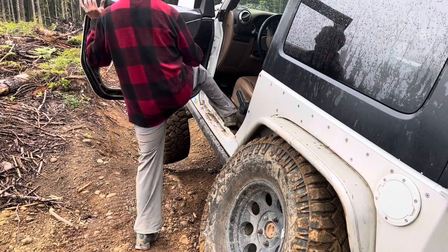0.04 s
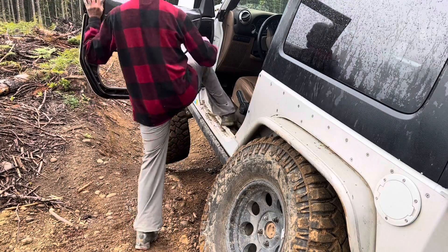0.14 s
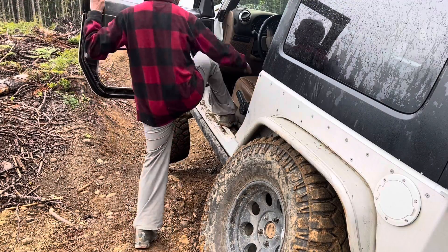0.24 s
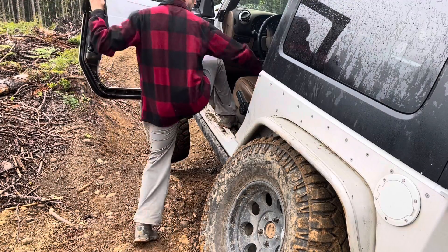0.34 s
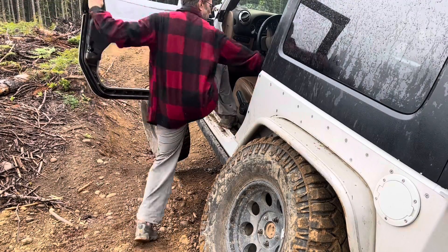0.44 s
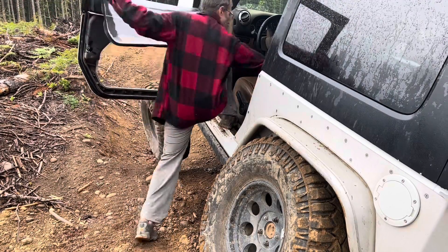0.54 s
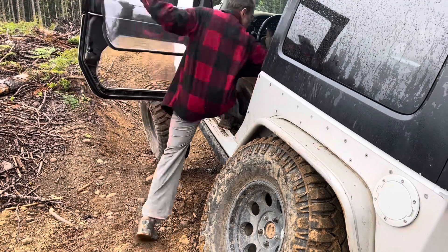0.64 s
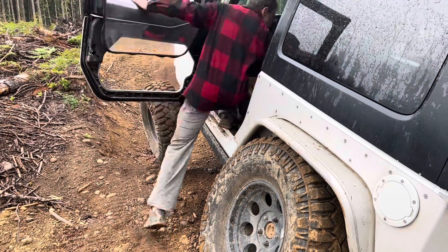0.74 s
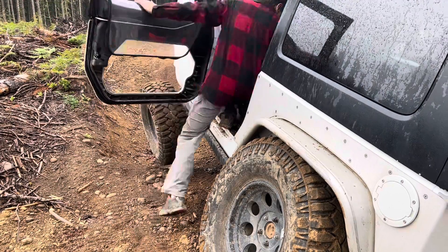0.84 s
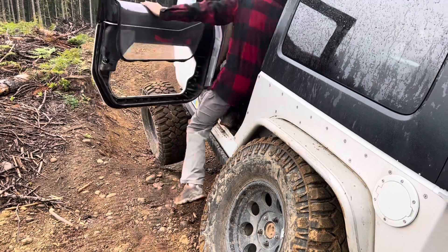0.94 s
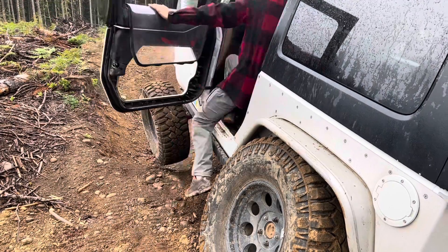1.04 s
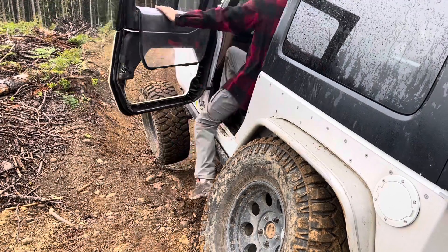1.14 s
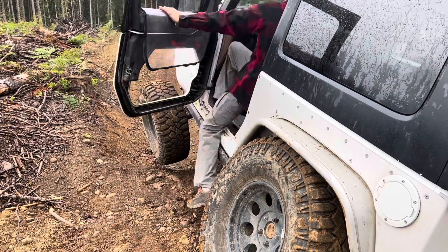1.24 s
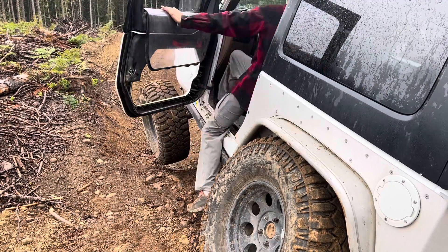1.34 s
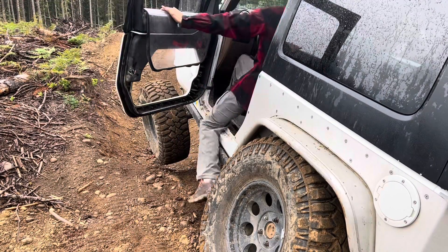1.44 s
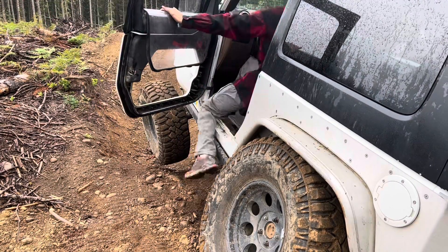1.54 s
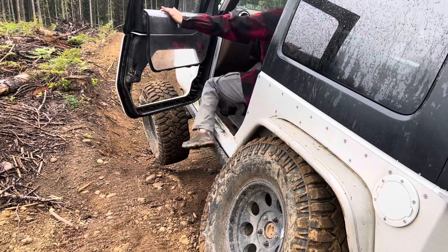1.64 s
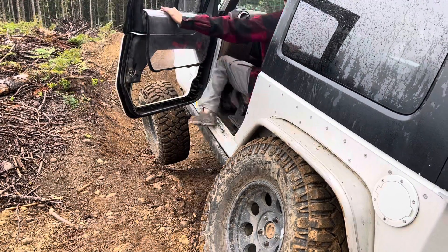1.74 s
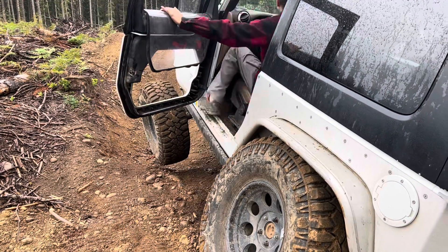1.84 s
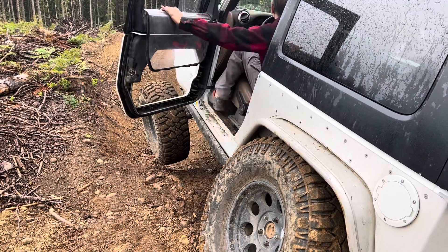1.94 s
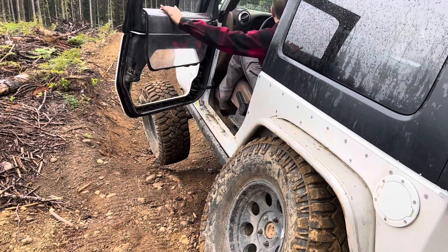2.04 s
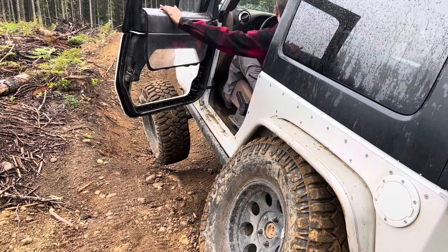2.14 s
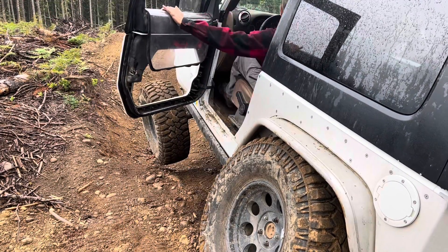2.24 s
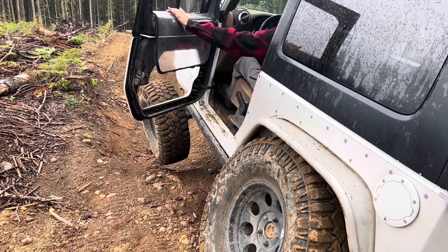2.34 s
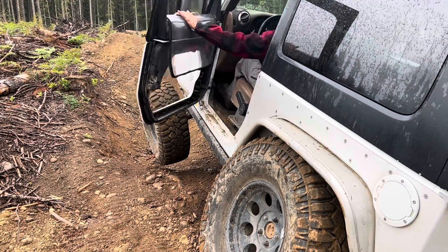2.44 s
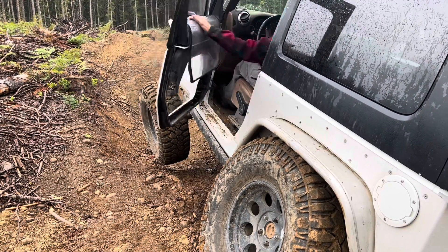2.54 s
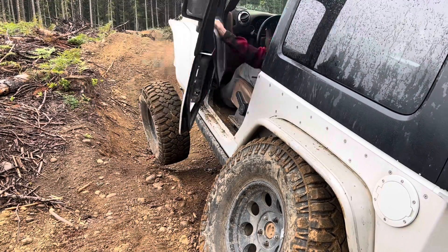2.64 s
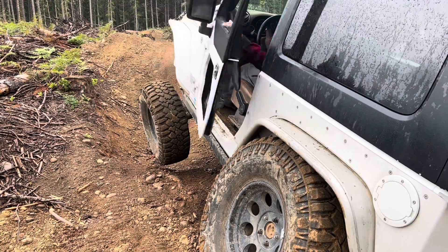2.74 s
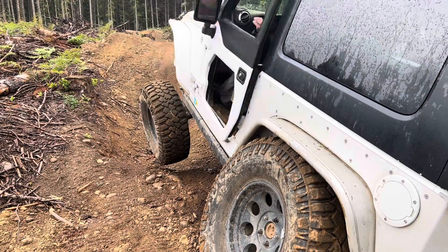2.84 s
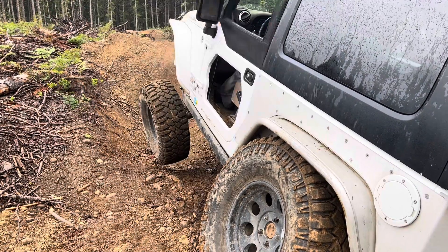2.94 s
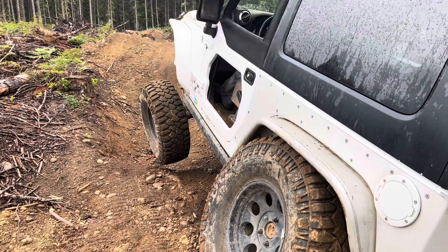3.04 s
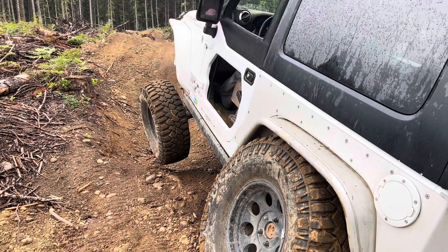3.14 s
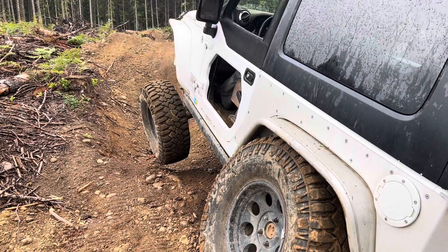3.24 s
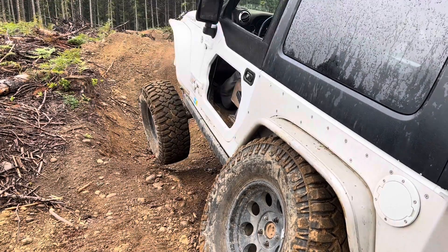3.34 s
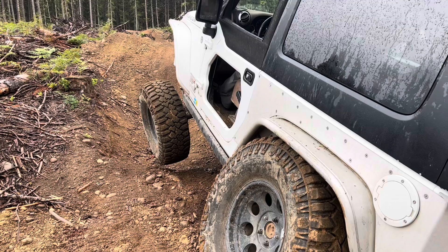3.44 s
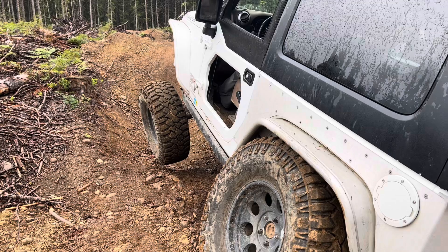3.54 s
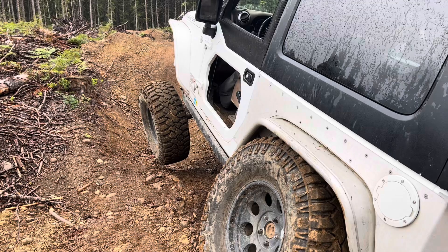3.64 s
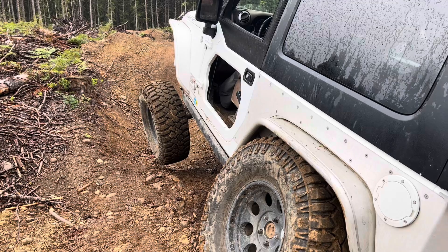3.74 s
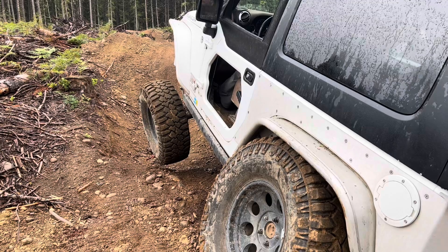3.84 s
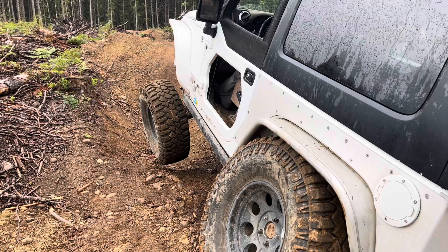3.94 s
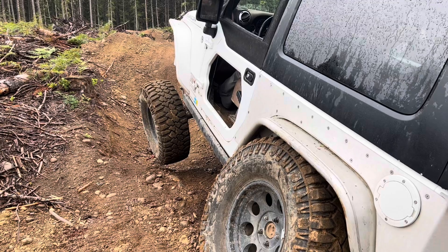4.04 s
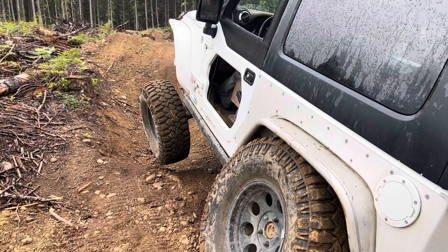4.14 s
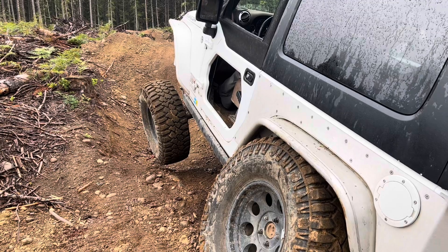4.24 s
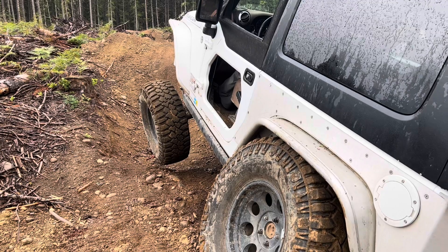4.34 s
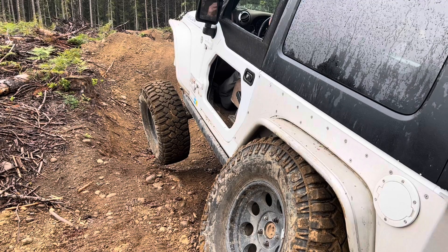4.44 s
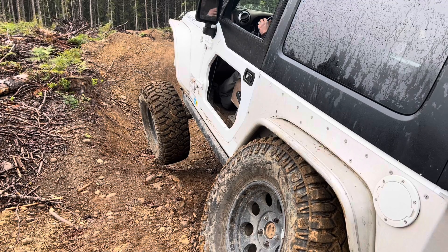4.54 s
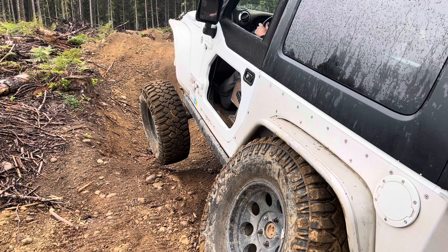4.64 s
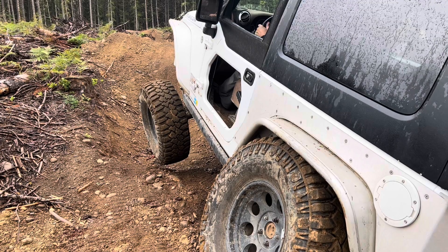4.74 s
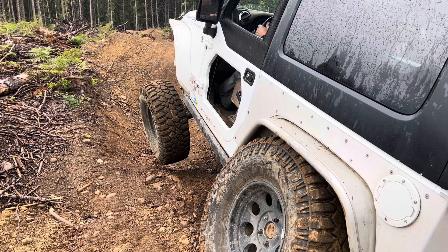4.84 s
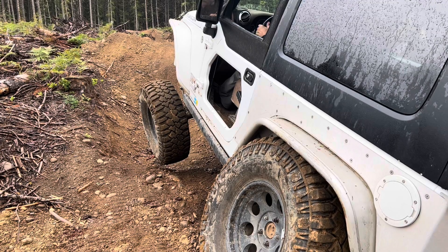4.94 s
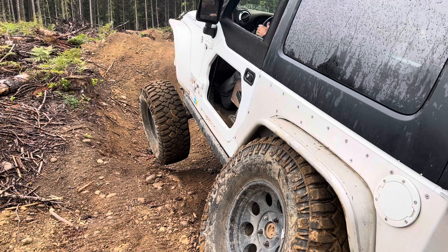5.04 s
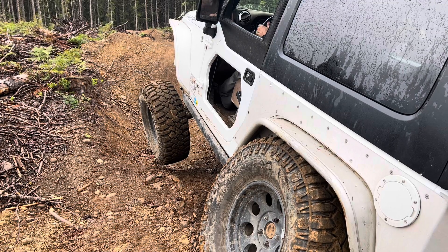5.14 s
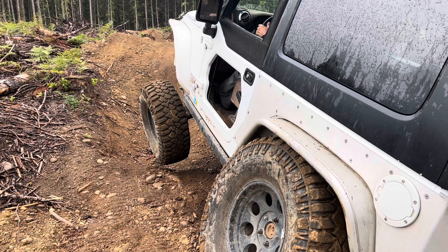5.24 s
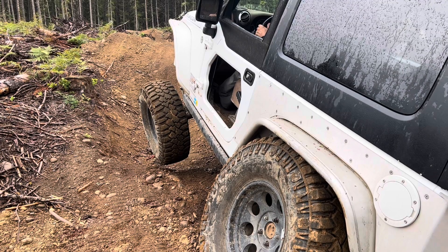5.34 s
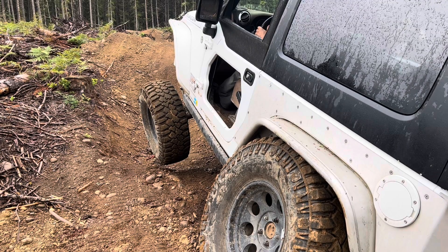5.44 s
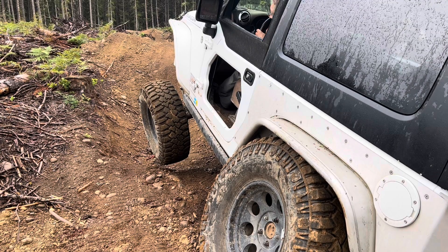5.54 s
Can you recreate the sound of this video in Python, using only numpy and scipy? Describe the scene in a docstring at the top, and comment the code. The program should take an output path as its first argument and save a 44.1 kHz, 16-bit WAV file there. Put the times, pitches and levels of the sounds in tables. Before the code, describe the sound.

Driver climbs into an idling off-road vehicle with soft thuds and scuffs, slams the door with a boomy rattle, then knocks and ratchets inside.

```python
"""An off-road car idles on a forest trail, wavering exhaust tones and hums over broad noise and far hiss.
The driver climbs in: damped resonances thud and knock, noise bursts scuff. One door slam booms in the cabin,
its contacts ringing panel and latch, while trim noise and a loose part rattle on. A small part clinks,
a ratcheting lever ticks and rings, and the driver settles in the seat as the idle sags.
Two close microphone ports hear it all with a phase lead that depends on pitch."""
import sys
import numpy as np
from scipy import signal
from scipy.fft import rfft, irfft, next_fast_len
from scipy.io import wavfile
from scipy.ndimage import uniform_filter1d

SR = 44100
rng = np.random.default_rng(int(sys.argv[2]) if len(sys.argv) > 2 else 0)


def master_out(mix):
    """Clip the mix to full scale and print it as 16-bit PCM to the path in sys.argv[1]."""
    frames = np.transpose(np.atleast_2d(mix))
    ceiling = np.clip(frames, -1, 1)
    pcm = np.round(ceiling * 32767).astype(np.int16)
    wavfile.write(sys.argv[1], SR, pcm)


N = 246078  # samples

# stereo width of the steady noises: pitch_hz, side_minus_mid_db
STEADY_WIDTH = [(60, -7), (150, -16.5), (380, -11.5), (950, -5), (2380, -1.5), (5980, 3), (9300, -19),
                (15000, -30)]


def door():
    """The weight booms in the cabin, contacts ring panel and latch; trim shudders on as dying noise."""
    # door contacts, from latch over seal to loose parts: start_s, crack_db, knock_db
    contacts = [(2.864, -24, -31), (2.8674, -9.5, -21.5), (2.8754, -17, -16), (2.8844, -17, -12),
                (2.8962, -12.5, -14), (2.9011, -29, -25.5), (2.9048, -32, -37), (2.91, -37, -35),
                (2.917, -34, -38), (2.923, -29, -43), (2.931, -19, -47), (2.9479, -24.5, -25),
                (2.9718, -29, -36.5), (2.9864, -45, -35), (2.9987, -36, -37), (3.024, -43, -41),
                (3.0532, -42, -40.5), (3.1108, -51, -43.5), (3.175, -52, -42)]
    # door panel and latch modes: pitch_hz, mean level_db against the contact, t60_s
    panel_modes = [(330, -37, 0.36), (374.7, -3.5, 0.25), (464, -32, 0.23), (512.6, -6.5, 0.16),
                   (564, -31, 0.3), (630, -32, 0.07), (715, -12, 0.073), (890, -16, 0.078),
                   (1000, -5.5, 0.036), (1125, -17, 0.23), (1314, -19, 0.046), (1550, -5.5, 0.025),
                   (1645, -24, 0.093), (2310, -21, 0.07), (2720, -18, 0.055), (3340, -31, 0.056),
                   (4440, -26, 0.049), (4680, -16, 0.025), (5700, -18, 0.014), (7200, -31, 0.047),
                   (15200, -17, .03)]
    # left against right for panel and trim: pitch_hz, left_minus_right_db
    door_pan = [(60, 0), (180, -2), (330, 0), (700, -4.5), (1650, -3), (4500, 1.5), (7000, 5), (15000, -3)]
    start_s, crack_db, knock_db = np.transpose(contacts)
    # the top treble against the crack: later contacts are duller, by 140 dB per second
    sizzle_db = crack_db - 12 - 140 * (start_s - start_s[0])

    def contact_db(hz):
        """Level of every contact at a pitch, between its knock, crack and sizzle."""
        levels = zip(knock_db, crack_db, sizzle_db)
        return np.array([at_hz([(700, knock), (3500, crack), (11000, sizzle)], hz)
                         for knock, crack, sizzle in levels])

    trim_noise = door_shudder(start_s, contact_db, door_pan)
    knocking = ground(door_boom() + loose_rattle() + latch_clacks())
    panel = strike(start_s, contact_db, panel_modes, spread_db=3.5, rise_cycles=5.0, pan=door_pan)
    return knocking + panel + trim_noise


def door_shudder(start_s, contact_db, door_pan):
    """Every contact shakes panels and trim: bands of noise that die away, each at its own pace."""
    # shudder after each contact: pitch_hz, level_db per Hz against the contact, t60_s
    shudder_bands = [(50, 12, 0.78), (124, 2, 0.34), (250, -0.5, 0.24), (413, 6.5, 0.22), (1033, 2, 0.11),
                     (2450, -2, 0.072), (6070, -12, 0.08), (8000, -8, 0.12), (11600, 1, 0.079),
                     (15000, -1.5, 0.055)]
    # stereo width of the shudder: pitch_hz, side_minus_mid_db
    slam_width = [(60, -24), (180, -18), (550, -8), (1650, -14), (4970, -3), (9300, -6), (15000, -14)]
    lumps = from_db(4 * np.tanh(drift(150.0)))  # the trim rattles in lumps

    def envelope(hz):
        """Left and right envelope of the trim noise in one band."""
        blows = clicks(start_s, contact_db(hz) + at_hz(shudder_bands, hz))
        dying = fade(blows, at_hz(shudder_bands, hz, axis=2))
        return lean(door_pan, hz) * soft(dying, hz=0.25 * hz) * lumps

    return bands(envelope, slam_width)


def door_boom():
    """The landing weight rings low cabin modes, softened by a low-pass, then the whole body swings."""
    # weight lands on seal and striker, each landing with its own tilt, the strongest one deepest:
    # start_s, level_db at 100 Hz, tilt_db per octave
    seal = [(2.876, -27.5, 3), (2.884, -23.5, 14), (2.9, -12, -39), (2.958, -42, 6)]
    # cabin and body modes: pitch_hz, mean level_db against the landing, t60_s
    cabin_modes = [(90, 1, 0.2), (102.8, 8, 0.22), (122.1, 5, 0.37), (171, -10, 0.71), (181, -3, 0.17),
                   (198, -15, 0.59)]
    # body swings after the blow: start_s, pitch_hz, peak_db, t60_s
    rocking = [(2.899, 46.6, -35, 0.56), (2.915, 78.6, -23, 0.12), (2.94, 120, -20, 0.15),
               (2.985, 115.6, -24, 0.16), (2.938, 54.5, -20, 0.26), (3.035, 51.6, -28, 0.29),
               (3.135, 56.2, -34, 0.27)]
    start_s, land_db, tilt_db = np.transpose(seal)

    def landing_db(hz):
        """Level of every landing at a pitch."""
        return land_db + tilt_db * np.log2(hz / 100)

    struck = strike(start_s, landing_db, cabin_modes, spread_db=1.5, rise_cycles=0)
    boom = -soft(struck, hz=278)  # the wave starts with suction
    # the open cabin radiates little of the blow below 71 Hz
    boom = signal.sosfilt(signal.butter(3, 71, "high", fs=SR, output="sos"), boom)
    return boom + sum(swell(at, db, hz, t60) for at, hz, db, t60 in rocking)


def latch_clacks():
    """Latch parts clack as short damped resonances, each at a pitch of its own."""
    # start_s, peak_db, pitch_hz, t60_s
    clacks = [(2.8668, -15.5, 5730, 0.0074), (2.8665, -18.5, 11260, 0.013), (2.8955, -23, 11440, 0.014),
              (2.8665, -26, 4860, 0.012), (2.867, -17.5, 1460, 0.012), (2.897, -25, 2400, .02),
              (2.931, -27, 4250, 0.01), (2.946, -30, 4200, 0.0069), (2.94, -30.5, 517, 0.23),
              (2.96, -29.5, 447.6, 0.14), (3.11, -39.5, 2730, .04), (3.112, -36, 1710, 0.026),
              (3.111, -55.5, 3900, 0.092), (3.4, -38, 566, 0.07), (3.174, -38, 2460, 0.016),
              (2.9, -47, 3150, .015)]
    return sum(swell(*row) for row in clacks)


def loose_rattle():
    """A loose part rattles on, mostly in pairs: noisy dying bursts of touches ring its modes."""
    # contacts of the loose part: start_s, level_db
    touches = [(2.9709, -29.5), (2.98, -32.5), (2.9864, -45), (2.9963, -36), (3.007, -40), (3.023, -39),
               (3.03, -43), (3.05, -41), (3.056, -49)]
    # modes of the loose part: pitch_hz, level_db per touch, t60_s
    loose_modes = [(1530, -30, .04), (1730, -28, .04), (2030, -27, .04), (2190, -32, .04),
                   (2720, -27, 0.043), (3100, -28, 0.027), (3280, -28, 0.035), (7600, -30, 0.02)]
    chatter_s = 0.012  # t60 of a burst
    out = 0
    for hz, db, t60 in loose_modes:
        bursts = fade(clicks(*np.transpose(touches)), chatter_s) * rng.standard_normal(N)
        out = out + ring(from_db(db) * bursts, hz, t60)
    return out


def thuds():
    """Padded blows and hollow knocks: damped resonances, each with a weaker partner above it."""
    # boots and weight on sill, floor and seat: start_s, level_db, pitch_hz, t60 in cycles
    blows = [(0.542, -36, 99, 6.9), (.735, -26.5, 252, 8.6), (1.025, -23, 71, 6.5), (1.224, -35, 99, 6.6),
             (1.385, -31.5, 109, 13), (1.544, -36, 69, 12), (2.139, -28, 60.3, 8.3),
             (2.171, -29.5, 83.4, 9.3), (2.438, -35, 54.4, 7.1), (3.558, -27.5, 220, 6.8),
             (3.558, -29, 92, 8.3), (4.122, -31, 247, 7.4), (4.125, -21.5, 103.3, 8.6),
             (4.15, -32.5, 125, 7.6), (4.388, -24.5, 119, 6.5), (4.994, -31, 135, 6.1)]
    # knocks on hollow trim: start_s, level_db, pitch_hz
    taps = [(.188, -44, 607), (.729, -38.5, 765), (1.207, -43, 595), (1.217, -42.5, 633), (1.235, -44, 643),
            (1.39, -37, 320), (1.874, -48.5, 518), (3.557, -41, 1074), (4.101, -43, 1216),
            (4.113, -45.5, 1220), (4.122, -31, 436), (4.123, -33, 648), (4.916, -48, 320)]
    tap_t60_s = 0.055
    rows = [(s, db, hz, cycles / hz) for s, db, hz, cycles in blows]
    rows += [(s, db, hz, tap_t60_s) for s, db, hz in taps]
    partials = ((1, 1), (1.568, -12.5))  # multiple of the pitch, gain in dB
    return sum(swell(s, db + gain_db, ratio * hz, t60)
               for s, db, hz, t60 in rows for ratio, gain_db in partials)[None]


def scuffs():
    """Cloth, grit and trim rubbed or snapped: gritty noise bursts with their own band, rise and tail."""
    # start_s, level_db at the crest, pitch_hz of the band, t60_s, pan_db left minus right
    rubs = [(0.716, -45, 2400, 0.12, -1), (.73, -49.5, 7600, 0.095, 4.5), (.733, -43, 445, 0.067, -14),
            (.801, -33.5, 2030, 0.13, -2), (0.8, -48.5, 5400, 0.13, 3), (1.046, -46.5, 1970, 0.34, -3),
            (1.045, -54, 8100, 0.86, 0), (1.074, -47.5, 2200, .15, 0), (1.105, -51.5, 8000, 0.26, 1),
            (1.199, -54, 8300, 0.089, 3), (1.198, -50.5, 800, 0.16, -4), (1.359, -48, 900, 0.17, -2),
            (1.386, -42, 800, .08, -5), (2.581, -40.5, 2900, 0.06, 4), (2.645, -41.5, 2320, 0.054, 0),
            (2.777, -49.5, 2780, 0.1, 5), (3.109, -38, 1820, 0.11, -3), (3.172, -48.5, 2230, 0.14, 2),
            (3.556, -37, 675, 0.16, -6), (3.561, -42, 7500, 0.11, 2), (3.563, -46.5, 3830, 0.073, 1),
            (3.781, -44, 2500, 0.066, 0), (3.786, -35.5, 2430, 0.093, 0), (4.122, -24, 360, 0.13, -3),
            (4.123, -47.5, 4300, 0.1, 2), (3.897, -50.5, 2300, 0.17, 1), (4.24, -41.5, 600, 0.12, -7),
            (4.389, -38.5, 298, 0.12, -1), (4.232, -55, 8000, 0.16, 1), (4.659, -45, 1640, 0.12, 0),
            (4.69, -45, 1300, 0.16, -2), (4.915, -40, 600, 0.3, -4), (4.972, -46, 2480, .08, 0),
            (4.941, -39, 2200, 0.09, 0), (4.948, -34.5, 2600, 0.088, 2), (4.997, -36.5, 1110, 0.13, -1.5),
            (4.997, -52.5, 4200, .06, 8)]
    # cabin trim modes: pitch_hz, mean level_db of a ringing that the grit feeds, t60_s
    trim_modes = [(1756, -48, 0.066), (1925, -42, 0.063), (2070, -46, 0.028), (2385, -40.5, 0.047),
                  (2800, -42, 0.023), (3210, -42, 0.033), (3620, -44, .03), (4940, -45, .03)]
    trim_spread_db = 3  # each scuff excites the trim modes unevenly
    out, t = np.zeros((2, N)), np.arange(SR // 2) / SR
    for s, db, hz, t60, pan_db in rubs:
        rise_s = 0.018 * t60 + 2 / hz  # a share of the tail plus two cycles: low scuffs take longer to build
        patches = rms_one(uniform_filter1d(rng.standard_normal(len(t)), size=96))
        mid, side = rng.standard_normal((2, len(t))) * from_db(3.9 * np.tanh(patches))
        pair = mid + from_db(at_hz([(3000, -6), (9000, -18)], hz)) * side * [[1], [-1]]
        edges_hz = [0.35 * hz, min(1.64 * hz, 0.45 * SR)]
        grit = rms_one(signal.sosfilt(signal.butter(2, edges_hz, "band", fs=SR, output="sos"), pair))
        trim = 0
        for mode_hz, mode_db, ring_s in trim_modes:
            own_db = mode_db + trim_spread_db * rng.standard_normal()
            trim = trim + from_db(own_db) * ring(grit, mode_hz, ring_s)
        grit = rms_one(rms_one(soft(grit, 1.54 * hz)) + trim)
        shape = np.minimum(t / rise_s, 1) * from_db(db - 60 * np.maximum(t - rise_s, 0) / t60)
        burst = grit * shape * from_db([[pan_db / 2], [-pan_db / 2]])
        at = round(s * SR)
        out[:, at:at + len(t)] += burst[:, :N - at]
    return out


def ratchet():
    """The pawl drops into a tooth: a bright tick of noise and a short ring of the lever."""
    # pawl drops: start_s, ring_db, tick_db
    drops = [(3.672, -47.5, -59), (3.9376, -53, -58), (3.998, -42, -54), (4.04, -35.5, -42.5),
             (4.1005, -38.5, -46)]
    # lever modes: pitch_hz, mean level_db against the drop, t60_s
    lever_modes = [(2030, -1, .025), (2097, -0.5, 0.032), (2544, 4, 0.051), (2570, -11, .03),
                   (3400, -15, 0.03), (4520, -14, 0.03)]
    start_s, ring_db, tick_db = np.transpose(drops)
    noise = rms_one(soft(np.diff(rng.standard_normal(N + 1)), hz=2500))
    tick = fade(clicks(start_s, tick_db), t60=0.047) * noise
    return strike(start_s, lambda hz: ring_db, lever_modes, spread_db=0.5, rise_cycles=33.0) + tick


def buckle():
    """A small metal part, perhaps the belt buckle, clinks once: its damped modes start together."""
    # pitch_hz, peak_db, t60_s
    clink_modes = [(5200, -45, 0.028), (6780, -43.5, 0.019), (8500, -52, 0.022), (11600, -46, .03),
                   (12900, -43, 0.046), (15300, -48, .03)]
    clink_s = 3.563
    return sum(swell(clink_s, db, hz, t60) for hz, db, t60 in clink_modes)


def engine():
    """Exhaust orders that waver, narrow hums and a broad, slightly patchy noise."""
    # idle speed: time_s, firings per s
    idle = [(0, 45.3), (2.8, 45.1), (4.3, 45), (4.9, 43.2), (5.58, 42.3)]
    # exhaust orders: multiple of the firing rate, level_db against the exhaust level
    orders = [(1, -2), (2, -11), (3, -13.5), (4, -16), (5, -19), (6, -37)]
    # narrow noisy hums of the engine bay: pitch_hz, level_db, width_hz
    hum_bands = [(245, -63.5, 2.5), (626, -61, 7.7), (1051, -66.5, 30), (1360, -66, 16)]
    # engine-bay noise spectrum: pitch_hz, relative level_db per Hz
    bay_spectrum = [(25, -6.5), (45, 2), (70, -2.5), (110, 4.5), (160, -11.5), (300, -8.5), (600, -19),
                    (1300, -21), (2100, -20), (3000, -39.5), (5000, -36), (9000, -48.5)]
    firing = np.interp(np.arange(N) / SR, *np.transpose(idle))
    sag = firing - firing.max()  # firings per s against full idle speed, zero or negative
    exhaust_db, bay_db = -40 + 2 * sag, -43.5 + 0.63 * sag  # both sink as the speed sags

    turns = np.cumsum(firing) / SR
    exhaust = sum(from_db(db + 1.7 * drift(3.0)) * np.sin(2 * np.pi * (order * turns + rng.random()))
                  for order, db in orders)

    hums = 0
    for hz, db, width_hz in hum_bands:
        # one noise shared by both sides plus one of each side's own
        noise = rng.standard_normal(N) + 1.02 * rng.standard_normal((2, N))
        hums = hums + from_db(db) * rms_one(ring(noise, hz, np.log(1000) / np.pi / width_hz))

    # a clean hum near 117 Hz, wavering a little in level and pitch
    pump_gain = from_db(-44.5 + 1.76 * drift(1.85))
    pump = pump_gain * np.sin(2 * np.pi * np.cumsum(117 + 0.5 * drift(1.87)) / SR)

    together = drift(6.3)  # shared by all bands

    def bay_gain(hz):
        """Lumpy bass, steadier treble."""
        lumps = 0.5 * together + drift(14.0)
        return from_db(at_hz(bay_spectrum, hz) + lumps * at_hz([(100, 2.5), (1500, 0.5)], hz))

    bay = rms_one(bands(bay_gain, STEADY_WIDTH))
    return from_db(exhaust_db) * exhaust + pump + hums + from_db(bay_db) * bay


def air():
    """Smooth far hiss: steady outdoor noise shaped in half-octave bands."""
    # pitch_hz, relative level_db per Hz
    hiss_spectrum = [(1000, -36), (2700, 15.5), (3800, 17.5), (5000, -0.5), (8500, 14.5), (12000, 5.5),
                     (15500, -14)]
    return from_db(-62.5) * rms_one(bands(lambda hz: from_db(at_hz(hiss_spectrum, hz)), STEADY_WIDTH))


def ground(x):
    """One dull bounce off soil and body side, reaching the right microphone later than the left."""
    echo = from_db(-17.0) * soft(x, hz=5000)
    lags_s = (0.0009, 0.0023)
    return x + np.array([np.roll(side, round(lag * SR)) for side, lag in zip(echo, lags_s)])


def strike(times, db, modes, spread_db, rise_cycles, pan=((20, 0), (20000, 0))):
    """Each blow, its db a function of pitch, rings every mode at a strength of its own, built up and panned."""
    own_db = spread_db * rng.standard_normal((len(times), len(modes)))
    out = 0
    for k, (hz, level_db, t60) in enumerate(modes):
        tone = ring(clicks(times, db(hz) + level_db + own_db[:, k]), hz, t60)
        out = out + build(tone, hz, rise_cycles) * lean(pan, hz)
    return out


def swell(s, db, hz, t60):
    """A blow passed from one damped resonance to the next: it builds to its peak before it dies."""
    at, out = round(s * SR), np.zeros(N)
    click = clicks([0], 0)[:min(SR, N - at)]
    x = ring(ring(click, hz, 0.5 * t60), hz, t60)
    out[at:at + len(x)] = from_db(db) * x / x.max()
    return out


def bands(gain, width):
    """Half-octave bands of stereo noise, each with gain(hz) over time and its own width."""
    out, edges = 0, 25 * 2 ** np.arange(0, 9.6, 0.5)
    white = rng.standard_normal((2, 2, N))  # neighbouring bands get unrelated noise
    for k, (low, high) in enumerate(zip(edges, edges[1:])):
        band = signal.butter(2, [low, high], "band", fs=SR, output="sos")
        mid, side = signal.sosfilt(band, white[k % 2])
        hz = np.sqrt(low * high)
        out = out + gain(hz) * (mid + from_db(at_hz(width, hz)) * side * [[1], [-1]])
    return out


def ring(x, hz, t60):
    """A damped resonance: a unit click sets a sine of starting height 1 ringing."""
    r, w = from_db(-60 / (t60 * SR)), 2 * np.pi * hz / SR
    return signal.lfilter([0, np.sin(w)], [1, -2 * r * np.cos(w), r * r], x)


def build(x, hz, cycles):
    """A broad resonance of about gain 1 rounds the start of a tone; zero cycles leave it as it is."""
    if not cycles:
        return x
    return 2 * (1 - from_db(-60 * hz / (cycles * SR))) * ring(x, hz, cycles / hz)


def soft(x, hz):
    """A padded contact: double one-pole low-pass."""
    r = np.exp(-2 * np.pi * hz / SR)
    return signal.lfilter([(1 - r) ** 2], [1, -2 * r, r * r], x)


def fade(x, t60):
    """Every click leaves an exponential tail."""
    return signal.lfilter([1], [1, -from_db(-60 / (t60 * SR))], x)


def clicks(times, db):
    """A train of single samples at the given times in seconds."""
    out = np.full(N, 1e-18)  # a tiny floor instead of zero
    out[np.round(np.asarray(times) * SR).astype(int)] = from_db(db)
    return out


def drift(rate):
    """Slow random wander of unit power, low-passed at rate in Hz."""
    step = 40  # samples between drawn points
    r = np.exp(-2 * np.pi * rate * step / SR)
    points = rng.standard_normal(N // step + 2002)
    slow = signal.lfilter([1], [1, -2 * r, r * r], points)[2000:]  # skip the filter's start
    return np.interp(np.arange(N) / step, np.arange(len(slow)), rms_one(slow))


def lean(pan, hz):
    """Left and right gain at a pitch."""
    return from_db(at_hz(pan, hz) * np.array([[0.5], [-0.5]]))


def at_hz(points, hz, axis=1):
    """A column of a table read on a log-frequency axis."""
    table = np.array(points)
    return np.interp(np.log(hz), np.log(table[:, 0]), table[:, axis])


def rms_one(x):
    """Scaled to unit power."""
    return x / np.sqrt(np.mean(x ** 2) + 1e-20)


def from_db(db):
    """Decibels to gain."""
    return 10 ** (np.asarray(db) / 20)


def scene():
    """Everything at the two microphone ports, turned apart in phase by half the lead each."""
    # near 10 and 14 kHz the ports are in opposite phase: pitch_hz, left_lead_rad
    port_lead = [(40, -.2), (150, -.45), (350, -.45), (750, -.1), (1400, -.05), (2800, .5), (5700, .4),
                 (8400, -.3), (9600, -3), (10500, -3.3), (10900, -4.9), (11900, -5.6), (12700, -7.6),
                 (13300, -9.2), (14400, -9.5), (15000, -12.3), (16000, -12.6)]
    both = engine() + air() + door() + scuffs() + ground(thuds() + ratchet() + buckle())
    size = next_fast_len(N + SR // 10)
    lead = at_hz(port_lead, (1 + np.arange(size // 2 + 1)) * SR / size)
    return irfft(rfft(both, size) * np.exp(0.5j * lead * [[1], [-1]]), size)[:, :N]


def record(dry):
    """The deep bass is cut, the loudest peaks are rounded, the top is cut."""
    lows_cut = signal.sosfilt(signal.butter(4, 35, "high", fs=SR, output="sos"), dry)
    rounded = 1.1 * np.tanh(lows_cut / 1.1)
    cutoff_hz = 15900
    return signal.sosfilt(signal.ellip(10, 0.5, 80, cutoff_hz, fs=SR, output="sos"), rounded)


dry = scene()
out = record(dry)
master_out(out)
```